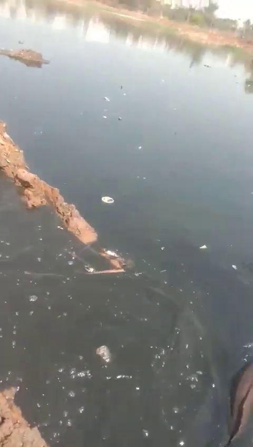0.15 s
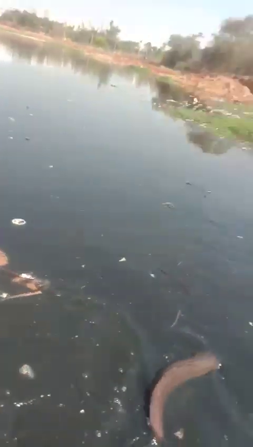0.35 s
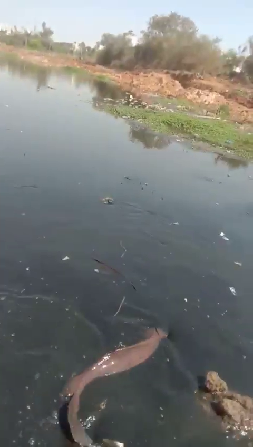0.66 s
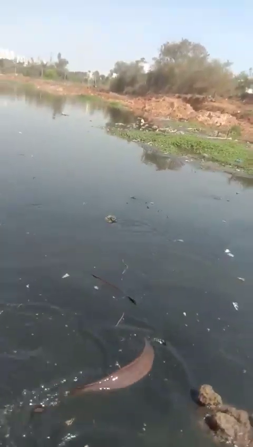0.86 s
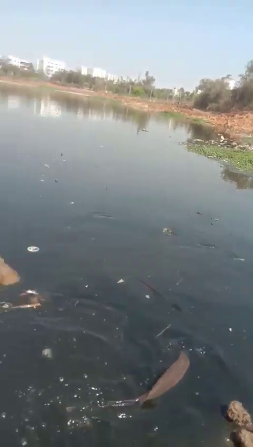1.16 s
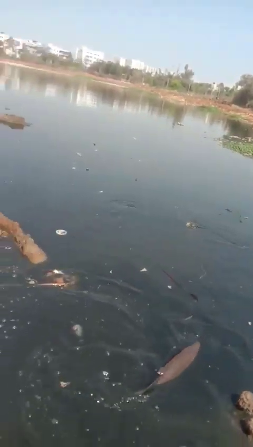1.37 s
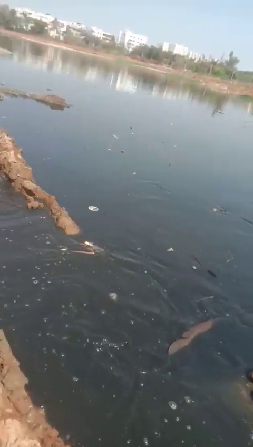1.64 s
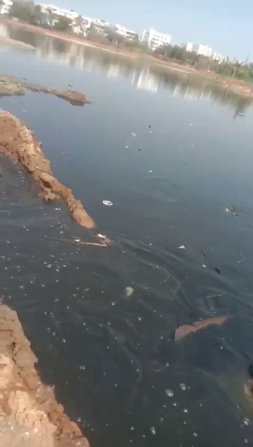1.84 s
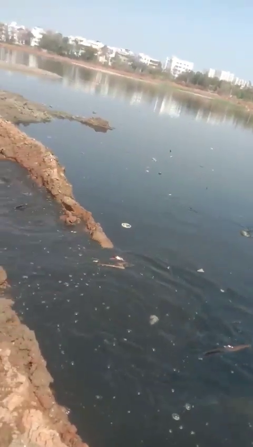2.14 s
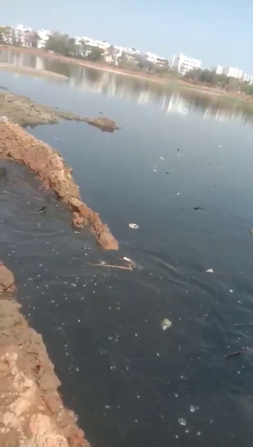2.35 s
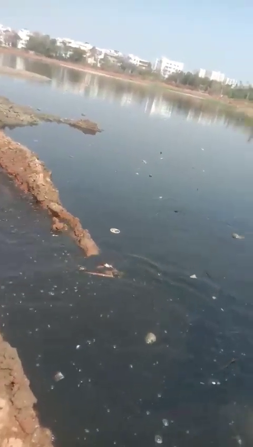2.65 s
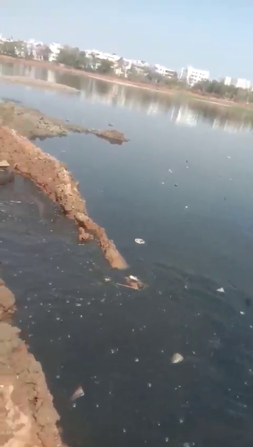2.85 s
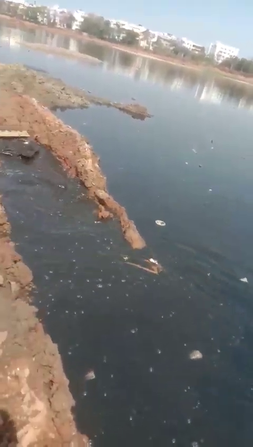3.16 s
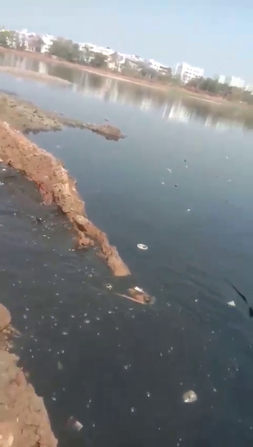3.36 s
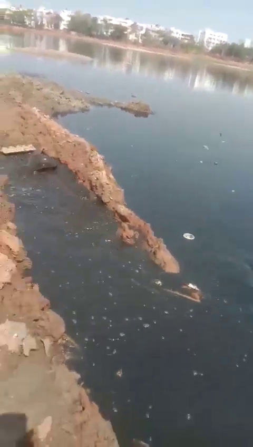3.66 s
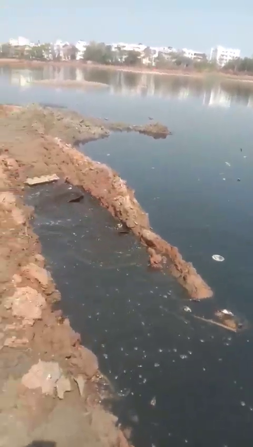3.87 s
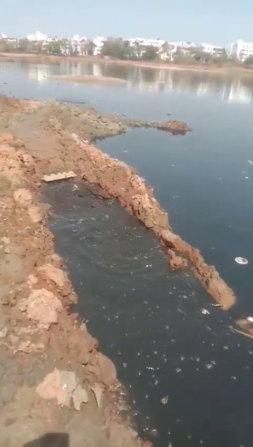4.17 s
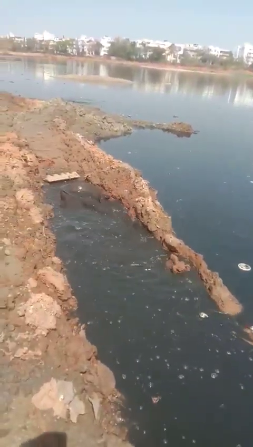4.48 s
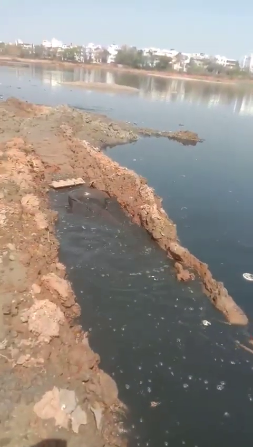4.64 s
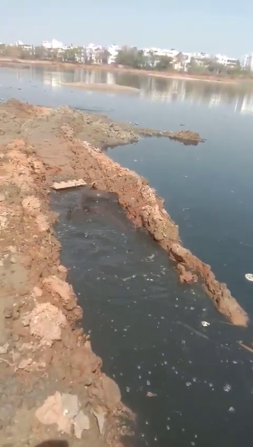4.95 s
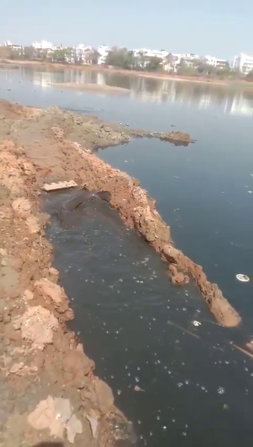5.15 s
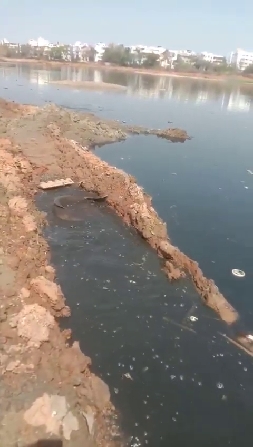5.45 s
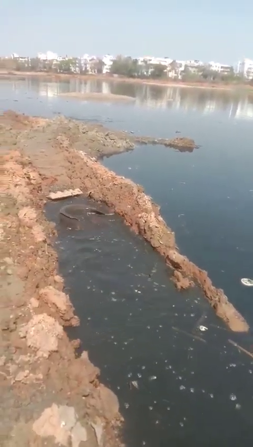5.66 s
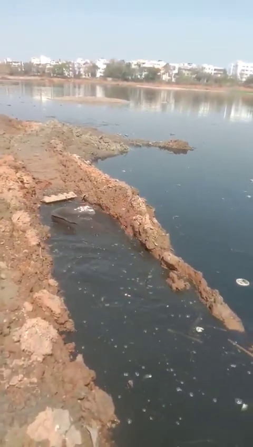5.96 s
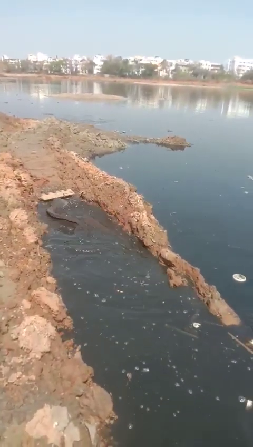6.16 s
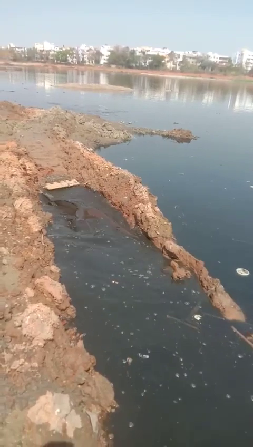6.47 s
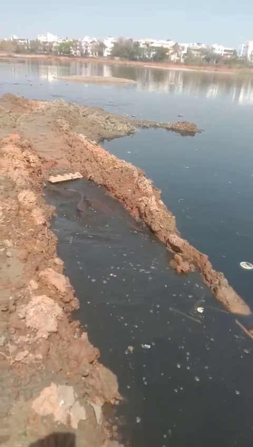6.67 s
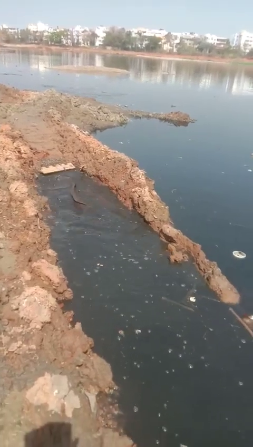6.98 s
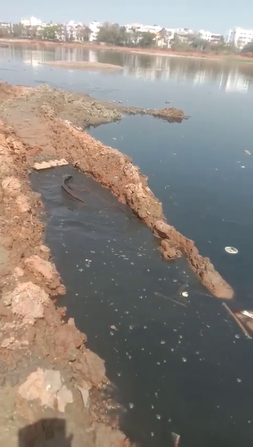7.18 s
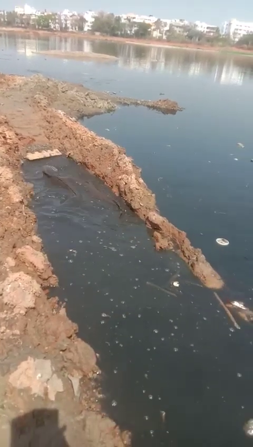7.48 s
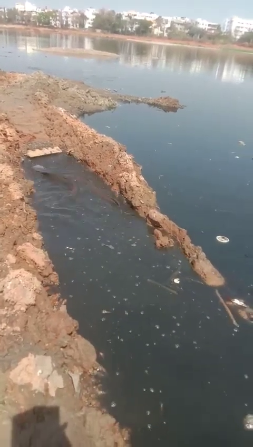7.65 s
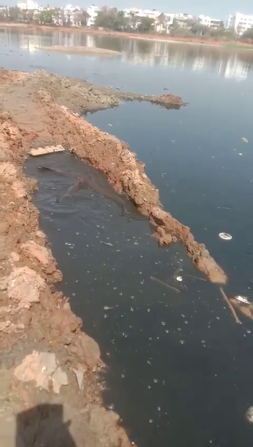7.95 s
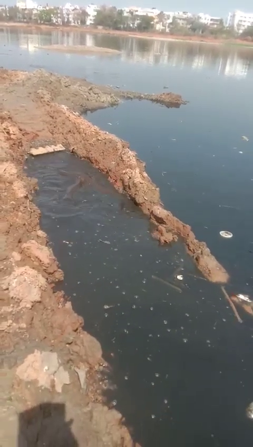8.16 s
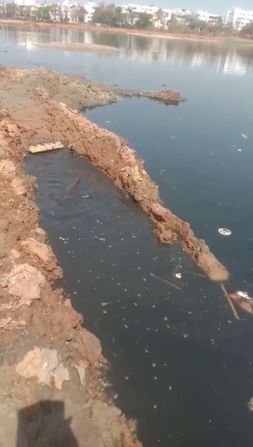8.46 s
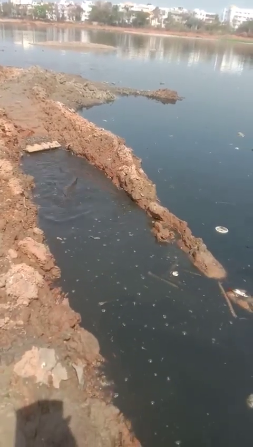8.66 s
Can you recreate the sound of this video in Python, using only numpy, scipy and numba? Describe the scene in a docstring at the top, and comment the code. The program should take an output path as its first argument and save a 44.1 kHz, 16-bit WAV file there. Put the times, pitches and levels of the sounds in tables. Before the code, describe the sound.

Fish stir a pond's surface with light splashes, drips and gurgles that thin out, while far engines hum and birds call faintly.

```python
"""Catfish thrashing in pond shallows.

The fish stir beside the bank, then further off in a narrow inlet. Each stroke throws a spray of
tiny ringing bubbles; drops snap, larger bubbles plop upward in pitch, tails slap. Distant engines
hum, a far horn sounds, birds call across the water, and a little wind reaches the phone."""
import sys
import numpy as np
from scipy import signal
from scipy.fft import rfft, irfft
from scipy.io import wavfile
from scipy.ndimage import uniform_filter1d, map_coordinates
from numba import njit

SR = 44100
rng = np.random.default_rng(int(sys.argv[2]) if len(sys.argv) > 2 else 0)


def wrap_up_sound(samples):
    """Save the sound to the file named by the first command line argument, as 16-bit audio."""
    columns = np.atleast_2d(samples).T
    # keep every value between -1 and 1, then stretch to whole-number steps
    tamed = np.clip(columns, -1, 1)
    steps = np.round(tamed * 32767).astype(np.int16)
    wavfile.write(sys.argv[1], SR, steps)


N = 388962
T = np.arange(N) / SR

# Table levels are relative: later gains and filters apply.
# Open-air murmur. Each row: frequency in Hz, density in dB.
AIR_SPECTRUM = [(25, -17), (45, -11.5), (75, -7), (110, -5), (230, -7), (320, -20), (700, -24), (1130, -27),
                (1260, -20), (1400, -30), (2200, -24.5), (6000, -35), (9000, -29.5)]
# Microphone port. Each row: frequency in Hz, gain in dB.
PORT_RESPONSE = [(550, 1.5), (1050, 0), (1260, 12), (1480, -2.5), (2350, 2), (3100, -7), (4150, 1),
                 (4900, -2.5), (5850, 8.5), (6300, 7.5), (6750, -6.5), (7400, -7.5), (8600, -20.5),
                 (10600, -19.5), (13500, -26), (15100, -13)]
# Wind on the microphone. Each row: centre in seconds, level in dB, half width in seconds.
WIND_GUSTS = [(2.83, -46.5, 0.035), (3.322, -34.5, 0.045), (3.563, -44.5, 0.064), (4.375, -40, 0.08),
              (5.026, -47, 0.12), (5.88, -46.5, 0.08)]
# Phone case modes. Each row: frequency in Hz, level in dB, decay in ms.
CASE_MODES = [(167, -38, 29), (480, -22, 1.8), (810, -35.5, 2.9)]
# Distant engine. Each row: time in seconds, firing rate in Hz, level in dB.
ENGINE_TRACK = [(0, 71.15, -49.5), (1.3, 69.7, -48.5), (1.8, 69.5, -48.5), (3.1, 71.52, -59.5),
                (5.0, 75.45, -54), (5.6, 71.8, -56.5), (7.6, 69.63, -48.5), (8.4, 70.3, -56.5),
                (8.8, 67.9, -67)]
# Swells of its third harmonic. Each row: centre in seconds, level in dB, half width in seconds.
ENGINE_SWELLS = [(6.43, -46, 0.16)]
# Another machine's drone. Each row: time in seconds, level in dB.
DRONE_TRACK = [(0, -51.5), (.25, -43.5), (1.5, -47.5), (2.15, -44.5), (2.6, -57), (4.1, -75), (7.1, -64),
               (8.8, -57.5)]
# Far horn. Each row: start in seconds, length in seconds, level in dB.
HORN_BLASTS = [(3.026, 0.22, -56.5), (7.724, 0.16, -63)]
# A small bird's rising chip. Each row: start in seconds, level in dB.
BIRD_CHIPS = [(4.77, -68), (7.51, -67), (7.652, -59.5), (7.803, -58), (7.938, -63)]
# Other bird notes. Each row: start in seconds, length in seconds, start pitch in Hz, level in dB,
# glide as a share of start pitch.
BIRD_NOTES = [(1.68, 0.062, 3250, -63, -0.14), (7.386, 0.05, 3780, -66, -0.17),
              (8.034, 0.034, 3900, -69, -0.14), (8.252, .04, 2860, -64, 0.039), (8.38, 0.03, 5030, -59, 0),
              (8.44, 0.11, 2680, -66.5, -0.079), (8.45, 0.27, 2100, -63, -0.2)]
# Finest foam. Each row: centre in seconds, level in dB, half width in seconds.
FOAM_SPURTS = [(.2, -37.5, 0.2), (.8, -39, 0.16), (2.43, -41.5, 0.065), (2.89, -48, 0.021),
               (3.27, -36, 0.038), (3.44, -43, 0.033), (4.22, -59, 0.13), (5.01, -47, 0.014),
               (6.38, -44, 0.048)]
# Single trapped bubbles. Each row: start in seconds, level in dB, start pitch in Hz.
PLOP_BUBBLES = [(0.687, -25, 1156), (0.863, -26.5, 1180), (2.183, -33, 1170), (2.283, -24.5, 2250),
                (2.715, -35, 1270), (3.209, -16.5, 1710), (3.529, -31.5, 1214), (4.076, -38, 890),
                (4.15, -39, 643), (4.2, -34, 723), (4.35, -33, 1500), (4.371, -39, 1230),
                (4.472, -25.5, 1540), (4.562, -22, 1440), (4.579, -25.5, 686), (5.067, -18.5, 2390),
                (6.775, -34, 1380), (6.794, -27.5, 1490), (7.443, -29, 2900), (7.822, -39, 1960),
                (7.847, -35, 1910)]
# Drops on the surface. Each row: start in seconds, level in dB, pitch in Hz.
DROP_SNAPS = [(0.0618, -10, 4100), (2.467, -24.5, 4450), (2.578, -23, 4300), (2.602, -16.5, 3200),
              (2.714, -11, 3800), (2.715, -14, 12000), (3.008, -9, 12200), (3.529, -22, 3220),
              (3.553, -28.5, 2800), (4.975, -20, 10500), (5.615, -21, 10500)]
# Flung droplet clusters. Each row: start in seconds, level in dB, middle pitch in Hz.
DROPLET_CLUSTERS = [(.058, -35, 5430), (.068, -10, 5400), (.106, -12, 5460), (.157, -15.5, 6160),
                    (.267, -23, 6200), (.456, -15, 5960), (.726, -14, 3900), (.784, -15, 4100),
                    (.951, -18.5, 3940), (1.968, -25.5, 4170), (1.974, -26.5, 2810), (1.982, -26, 4440),
                    (3.243, -12, 5460), (3.253, -15, 6000), (3.257, -16, 6060), (3.4, -25, 5850),
                    (3.966, -27, 6400), (4.195, -24, 6200), (5.113, -29.5, 5450), (5.141, -32, 5600),
                    (5.735, -35.5, 5470), (6.277, -26.5, 8800), (6.338, -26.5, 4670), (6.388, -19, 10300),
                    (6.598, -35, 5840), (6.867, -29.5, 6040)]
# Sheets of water. Each row: start in seconds, level in dB, length in seconds, low and high edge in Hz.
WATER_SHEETS = [(0.694, -25, 0.0045, 300, 7350), (0.809, -33, 0.012, 1020, 6700),
                (0.86, -37, 0.0089, 1150, 7500), (3.016, -41.5, 0.038, 393, 15100),
                (3.869, -39, 0.011, 480, 7400), (3.889, -38, 0.0074, 484, 7300),
                (3.969, -53.5, 0.014, 870, 1780), (4.112, -57, .018, 900, 2900),
                (4.195, -51.5, 0.0071, 700, 2850), (4.284, -59.5, 0.094, 2180, 2760),
                (4.474, -53, 0.013, 1520, 6600), (4.532, -47.5, 0.011, 1900, 2800),
                (4.549, -52, 0.017, 4930, 6100), (4.618, -53.5, 0.042, 1280, 2620),
                (6.682, -54.5, 0.0065, 1160, 4760), (6.792, -48, 0.011, 1800, 3200),
                (7.221, -54, 0.0051, 3230, 5840), (7.434, -54, 0.027, 1280, 5100),
                (7.475, -51, 0.0034, 3680, 6300)]
# Flat blows on the water. Each row: start in seconds, level in dB, body pitch in Hz.
FLAT_BLOWS = [(.692, -19.5, 426), (2.603, -24.5, 378), (2.714, -17.5, 1000), (3.009, -25.5, 510),
              (3.021, -27.5, 405)]
# Surface reflection as the fish moves. Each row: time in seconds, first resonance in Hz, mirrored share.
SURFACE_COMB = [(0, 2270, 0.16), (.55, 1930, 0.16), (.8, 1930, 0.083), (1.1, 1810, 0.46), (1.6, 2050, 0.21),
                (2.3, 2170, 0.25), (2.75, 2190, 0.25), (3.05, 2050, 0.088), (3.6, 1900, 0.1),
                (4.3, 2960, 0.39)]
# Spray colour. Each row: frequency in Hz, gain in dB.
SPRAY_RESPONSE = [(1200, -2), (2000, -3.5), (3200, 2), (4500, 4.5), (6200, 0), (9000, 2.5), (15000, 3)]
# Fish strokes. Each row: crest in seconds, spray and gurgle level in dB, build and settle in seconds.
FISH_STROKES = [(.03, -34.5, -43.5, 0.15, 0.08), (.28, -34.5, -46.5, 0.17, 0.32),
                (.45, -54, -51, 0.036, 0.067), (.71, -34, -44.5, 0.086, 0.13),
                (0.879, -34, -49, 0.021, 0.22), (1.12, -45.5, -53, 0.07, 0.16),
                (1.452, -46, -52, 0.012, 0.06), (1.581, -48.5, -55, 0.077, 0.091),
                (2.291, -44, -47.5, 0.024, 0.21), (2.42, -44, -62, 0.085, 0.19),
                (2.66, -43.5, -55, 0.024, 0.17), (2.89, -41, -61, 0.043, 0.13),
                (3.14, -43, -49.5, 0.075, 0.28), (3.253, -37, -55, 0.0091, 0.088),
                (3.4, -40, -47, 0.06, 0.11), (3.56, -49, -52.5, 0.021, 0.086),
                (3.74, -51, -77, 0.013, 0.035), (3.885, -48.5, -48, 0.04, 0.028),
                (3.98, -54, -57, 0.031, 0.1), (4.14, -54, -55, 0.093, .08), (4.3, -53, -69, 0.2, 0.39),
                (4.61, -57.5, -48.5, 0.078, 0.071), (5.009, -45, -54, 0.046, 0.086),
                (5.312, -59, -62, 0.12, 0.18), (5.61, -55.5, -54, 0.089, 0.11),
                (6.38, -49.5, -54, 0.15, 0.13), (6.82, -62.5, -57, 0.072, 0.081),
                (7.02, -63, -59, 0.12, 0.11), (7.64, -66.5, -69, 0.094, 0.18)]


def undb(db):
    """Decibels to gain."""
    return 10 ** (np.asarray(db) / 20)


def unit(x):
    """Scale to rms 1."""
    return x / np.sqrt(np.mean(x ** 2))


def add(out, start_s, sound):
    """Mix a short sound in."""
    first = int(start_s * SR)
    out[first:first + len(sound)] += sound[:N - first]


def curves(table):
    """Table columns, linearly interpolated in time."""
    times_s, *columns = np.transpose(table)
    return [np.interp(T, times_s, column) for column in columns]


def humps(table):
    """Sum of Gaussian gain swells."""
    return sum(undb(db) * np.exp(-((T - centre_s) / width_s) ** 2) for centre_s, db, width_s in table)


def walk(rate_hz):
    """Continuous random drift, spread 1."""
    steps = rng.standard_normal(4096)
    return np.sqrt(1.5) * np.interp(T * rate_hz, np.arange(len(steps)), steps)


def colour(x, response, size=8192):
    """Minimum-phase filter through (Hz, dB) points."""
    hz, db = np.transpose(response)
    grid_hz = np.maximum(np.arange(size // 2 + 1) * SR / size, 1)
    gain = undb(np.interp(np.log(grid_hz), np.log(hz), db))
    cepstrum = irfft(np.log(gain))
    cepstrum[1:size // 2] *= 2
    cepstrum[size // 2 + 1:] = 0
    return signal.fftconvolve(x, irfft(np.exp(rfft(cepstrum))))[:N]


def noise(spectrum):
    """Noise of rms 1, shaped by (Hz, dB) points."""
    return unit(colour(rng.standard_normal(N), spectrum))


@njit
def ring(start_s, gain, hz, decay_s, rise, swell):
    """Damped sines. Rise: relative pitch climb per decay time. Swell: attack as a share of it."""
    out = np.zeros(N)
    for k in range(len(start_s)):
        first = int(start_s[k] * SR)
        for i in range(max(first, 0), min(first + int(6 * decay_s[k] * SR), N)):
            t = (i - first) / SR
            age = t / decay_s[k]
            envelope = gain[k] * np.exp(-age) * (1 - np.exp(-age / swell))
            out[i] += envelope * np.sin(2 * np.pi * hz[k] * t * (1 + rise[k] * age / 2))
    return out


def swarm(count, low_hz, high_hz, cycles, spread_db, rise=0.0, swell=0.5):
    """A crowd of bubbles, many faint, a few strong, held at an even level."""
    when, pitch, strength, damping = rng.random((count, 4)).T
    hz = np.minimum(low_hz * (high_hz / low_hz) ** pitch, SR / 3)
    gain = undb(-spread_db * np.log(1 - 0.99 * strength)) * (-1) ** np.arange(count)
    decay_s = cycles * 2 ** (3 * damping - 1.5) / hz
    bubbles = ring(when * N / SR, gain, hz, decay_s, np.full(count, rise), swell)
    return bubbles / np.sqrt(uniform_filter1d(bubbles ** 2, size=4000) + 1e-6)


def echo(x, t60_s, wet_db):
    """Add scattered, dying returns from the banks."""
    t = T[:SR]
    tail = rng.standard_normal(SR) * undb(-60 * t / t60_s) * (t > 0.004)
    return x + undb(wet_db) * signal.fftconvolve(x, tail / np.sqrt(np.sum(tail ** 2)))[:N]


def air(level_db=-56):
    """Open-air murmur, coloured by the microphone port."""
    return undb(level_db) * unit(colour(noise(AIR_SPECTRUM), PORT_RESPONSE))


def wind():
    """Soft buffets on the microphone over restless eddies."""
    eddies = undb(-61 + 4 * walk(9)) * noise([(30, -30), (70, 0), (200, 0), (900, -80)])
    rumble = noise([(25, -50), (55, -6.5), (85, 5), (130, -8), (250, -36), (800, -81)])
    return eddies + humps(WIND_GUSTS) * rumble


def finger_bump(start_s=7.575):
    """A finger knocks the phone's case; its modes ring dully."""
    hz, db, decay_ms = np.array(CASE_MODES, float).T.copy()
    return ring(np.full(len(hz), start_s), undb(db), hz, decay_ms / 1000, np.zeros(len(hz)), swell=0.25)


def engines(beat_hz=3.9, in_step_s=5.8, twin_db=-4):
    """Two far engines throb, slightly out of step; moving air swells and fades each partial."""
    firing_hz, db = curves(ENGINE_TRACK)
    phase = 2 * np.pi * np.cumsum(firing_hz) / SR
    twin_phase = phase + 2 * np.pi * beat_hz * (T - in_step_s) + 2.76 * walk(3.7)
    hum_gain = undb(db + 0.65 + 3.2 * walk(22))
    fundamentals = np.sin(phase) + undb(twin_db) * np.sin(twin_phase)
    second = undb(-4.5 + 2.4 * walk(16)) * np.sin(2 * phase + 2.75 * walk(22))
    third_gain = (undb(db - 6) + humps(ENGINE_SWELLS)) * undb(3.5 + 2 * walk(22))
    third = np.sin(3 * phase + 1.25 * walk(25))
    return hum_gain * (fundamentals + second) + third_gain * third


def drone(hz=230.7):
    """Another far machine: one tone wavering in moving air."""
    db, = curves(DRONE_TRACK)
    return undb(db + 1.5 + 2 * walk(22)) * np.sin(2 * np.pi * hz * T + 1.35 * walk(24))


def horn(hz=422, attack_s=0.0092, release_s=0.19):
    """Horn on the far shore: the fundamental and two high partials carry, wavering in the air."""
    gate = np.zeros(N)
    for start_s, length_s, db in HORN_BLASTS:
        corners_s = start_s + np.array([0, attack_s, length_s, length_s + release_s])
        gate += undb(db) * np.interp(T, corners_s, [0, 1, 1, 0])
    phase = 2 * np.pi * hz * T + 0.81 * walk(38)
    tone = np.sin(phase) + undb(-11) * (np.sin(6 * phase) + np.sin(7 * phase))
    return gate * undb(1.5 + 2.4 * walk(33)) * tone


def bird_note(start_s, length_s, hz, db, glide):
    """Short gliding note with a rounded envelope."""
    progress = np.clip((T - start_s) / length_s, 0, 1)
    envelope = np.sqrt(4 * progress * (1 - progress))
    turns = hz * length_s * progress * (1 + glide * progress / 2)
    return undb(db) * envelope * np.sin(2 * np.pi * turns)


def bird_whistle(start_s=8.265, rise_s=0.11, sag_s=0.36, fade_db_per_s=36.5):
    """The near bird's long call: pitch and level climb, then sag and fade."""
    start_hz, top_hz, end_hz = 1330, 1585, 1184
    age_s = np.maximum(T - start_s, 0)
    climb = np.sin(np.pi / 2 * np.minimum(age_s / rise_s, 1))
    past_top_s = np.maximum(age_s - rise_s, 0)
    sag_hz = (top_hz - end_hz) * (1 - np.exp(-past_top_s / sag_s))
    hz = start_hz + (top_hz - start_hz) * climb - sag_hz
    return climb * undb(-46 - fade_db_per_s * past_top_s) * np.sin(2 * np.pi * np.cumsum(hz) / SR)


def birds():
    """Calls across the water: scattering frays them, the shore echoes them."""
    notes = sum(bird_note(*row) for row in BIRD_NOTES)
    chips = sum(bird_note(s, length_s=0.037, hz=4030, db=db, glide=0.125) for s, db in BIRD_CHIPS)
    fray = walk(350)
    far = echo((notes + chips) * (0.5 + fray), t60_s=0.3, wet_db=-2)
    near = echo(bird_whistle() * (1 + 0.5 * fray), t60_s=0.85, wet_db=-9.5)
    return near + undb(4.5) * far


def drips(count=130, span_s=9.3):
    """Faint lone drips and bursting foam, at random times."""
    when, pitch, strength = rng.random((count, 3)).T
    hz = 1000 * 7 ** pitch
    return ring(when * span_s, undb(-49 + 10 * strength), hz, 4 / hz, np.zeros(count), swell=0.71)


def foam():
    """Tiny bubbles fizz in one narrow, very high band."""
    return humps(FOAM_SPURTS) * swarm(5000, low_hz=9300, high_hz=11600, cycles=7, spread_db=6)


def plops(decay_cycles=5.7, rise_per_s=16):
    """Air pockets ring, big ones longer, and climb in pitch as they near the surface."""
    start_s, db, hz = np.array(PLOP_BUBBLES).T.copy()
    decay_s = decay_cycles / hz
    return ring(start_s, undb(db - 4), hz, decay_s, rise_per_s * decay_s, swell=0.48)


def drops(decay_cycles=1):
    """Drops snap on the surface, the finest at the highest pitch."""
    start_s, db, hz = np.array(DROP_SNAPS).T.copy()
    return ring(start_s, undb(db + 10.5), hz, decay_cycles / hz, np.zeros(len(hz)), swell=0.51)


def spatters(count=16, scatter_s=0.0024, spread_octaves=0.24, decay_cycles=0.86):
    """Flung water breaks into droplets that land milliseconds apart, each with a tiny ring."""
    start_s, db, middle_hz = np.repeat(DROPLET_CLUSTERS, count, axis=0).T
    late, pitch = rng.random((len(start_s), 2)).T
    landing_s = start_s - scatter_s * np.log(1 - late)
    hz = np.minimum(middle_hz * 2 ** (spread_octaves * (2 * pitch - 1)), SR / 3)
    return ring(landing_s, undb(db - 4.5), hz, decay_cycles / hz, np.zeros(len(hz)), swell=0.45)


def slaps(onset_s=0.0021, release_s=0.0042):
    """Each sheet of water lands as a dense, grainy burst in its own band."""
    out = np.zeros(N)
    t = T[:SR // 10]
    for start_s, db, length_s, low_hz, high_hz in WATER_SHEETS:
        grain = rng.standard_normal(len(t)) * undb(0.9 * walk(430)[:len(t)])
        band = signal.butter(3, [low_hz, high_hz], btype="band", fs=SR, output="sos")
        envelope = np.minimum(t / onset_s, 1) * np.exp(-np.maximum(t - length_s, 0) / release_s)
        add(out, start_s, undb(db) * envelope * unit(signal.sosfilt(band, grain)))
    return out


def smacks(crack_hz=7000, fall_s=0.0005, decay_s=0.0016):
    """Flat blows on the water: a bright crack falls at once to a hollow body."""
    out = np.zeros(N)
    t = T[:SR // 20]
    for start_s, db, body_hz in FLAT_BLOWS:
        turns = body_hz * t + (crack_hz - body_hz) * fall_s * (1 - np.exp(-t / fall_s))
        add(out, start_s, undb(db) * np.exp(-t / decay_s) * np.sin(2 * np.pi * turns))
    return out


def surface_reflection(x):
    """The surface mirrors the splash slightly later: a hollow, moving comb."""
    comb_hz, share = curves(SURFACE_COMB)
    mirrored = map_coordinates(x, [np.arange(N) - SR / comb_hz], order=3)
    return (x + share * mirrored) / np.sqrt(1 + share ** 2)


def ripples(x, depth_db=4):
    """Moving ripples focus and scatter the sound; narrow bands swell and fade separately."""
    bands = signal.stft(x, nperseg=512)[2]
    patches = uniform_filter1d(rng.standard_normal(bands.shape), size=3, axis=0)
    patches = uniform_filter1d(patches, size=7, axis=1)
    scattered = signal.istft(bands * undb(depth_db * unit(patches)))[1][:N]
    return np.std(x) * unit(scattered)


def strokes():
    """Spray and gurgle gains: each stroke builds to a crest, then settles; powers add."""
    spray, gurgle = np.zeros(N), np.zeros(N)
    for crest_s, spray_db, gurgle_db, build_s, settle_s in FISH_STROKES:
        t = T - crest_s
        power = np.exp(-2 * np.where(t < 0, (t / build_s) ** 2, t / settle_s))
        spray += undb(spray_db) ** 2 * power
        gurgle += undb(gurgle_db) ** 2 * power
    return np.sqrt(spray), np.sqrt(gurgle)


def churn():
    """Water stirred by the fish: spray crackles over a wash, mist ticks, bigger bubbles gurgle."""
    spray_gain, gurgle_gain = strokes()
    crackle = swarm(24000, low_hz=1446, high_hz=7900, cycles=1.5, spread_db=5, swell=0.69)
    fizz = swarm(3000, low_hz=1700, high_hz=7000, cycles=4, spread_db=3, rise=0.012)
    mist = swarm(600, low_hz=7500, high_hz=16000, cycles=3, spread_db=4)
    hiss = undb(4.5 * walk(150)) * rng.standard_normal(N)
    spray = unit(colour(crackle + undb(-4) * fizz + hiss + undb(-5.5) * mist, SPRAY_RESPONSE))
    gurgle = swarm(4000, low_hz=586.6, high_hz=2250, cycles=4.7, spread_db=6.5, rise=0.042, swell=0.25)
    wash = undb(-3) * noise([(100, -6), (350, -4.5), (900, 5), (1600, 16.5), (3500, -43)])
    slosh = undb(0.8 * walk(28))
    return slosh * (undb(1.35) * spray_gain * spray + undb(-3.5) * gurgle_gain * (gurgle + wash))


def scene():
    """Water through the port's resonances, over the shore sounds; nearly mono."""
    stirred = ripples(surface_reflection(churn()))
    water = echo(stirred + drips() + foam(), t60_s=0.043, wet_db=-12.5)
    water += echo(plops() + slaps() + spatters(), t60_s=0.28, wet_db=-9)
    water += echo(drops() + smacks(), t60_s=0.017, wet_db=-12.5)
    background = engines() + drone() + horn() + birds() + finger_bump() + wind() + air()
    mid = colour(water, PORT_RESPONSE) + background
    returns = echo(mid, t60_s=0.0085, wet_db=-29) - mid
    side = undb(-45) * returns + undb(-82.5) * noise(AIR_SPECTRUM)
    return np.array([mid + side, mid - side])


def record(dry):
    """The phone cuts the top."""
    cutoff_hz = 15600
    return signal.sosfilt(signal.ellip(10, 0.2, 80, cutoff_hz, fs=SR, output="sos"), dry)


dry = scene()
out = record(dry)
wrap_up_sound(out)
```